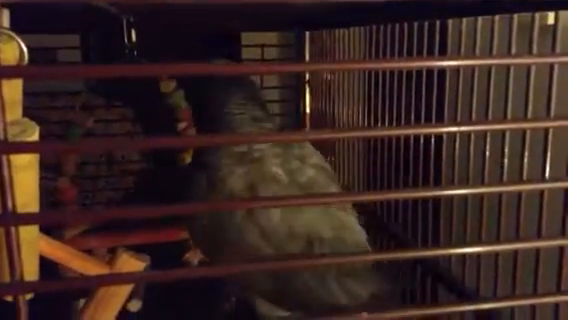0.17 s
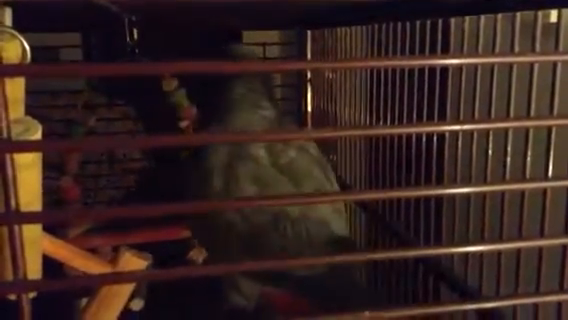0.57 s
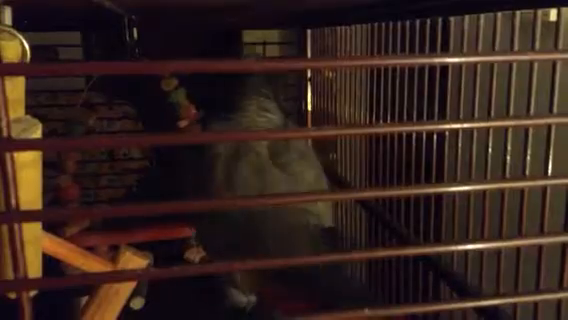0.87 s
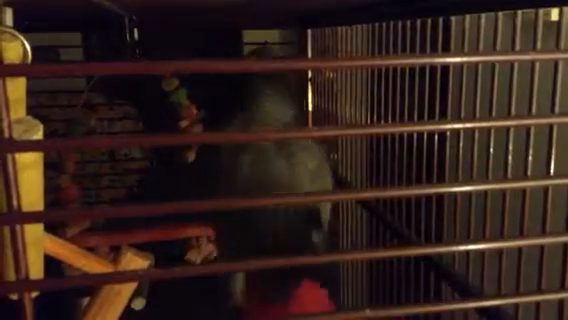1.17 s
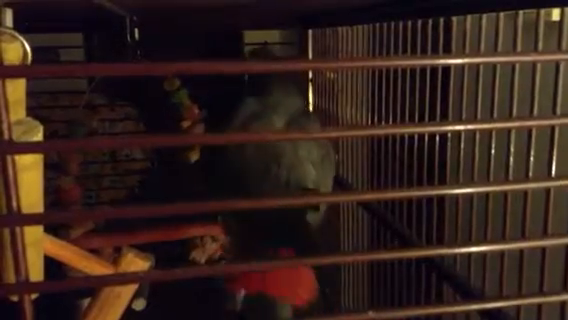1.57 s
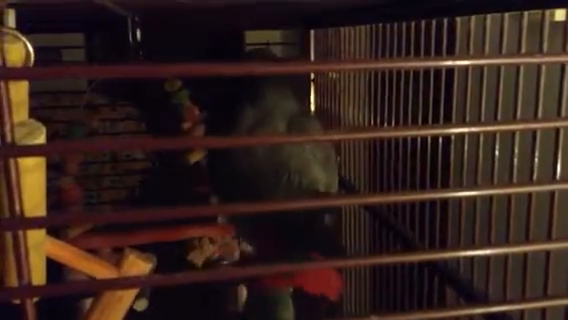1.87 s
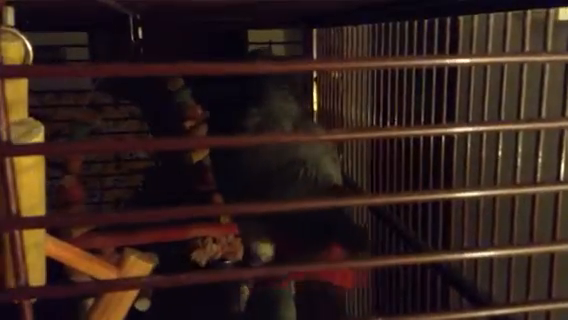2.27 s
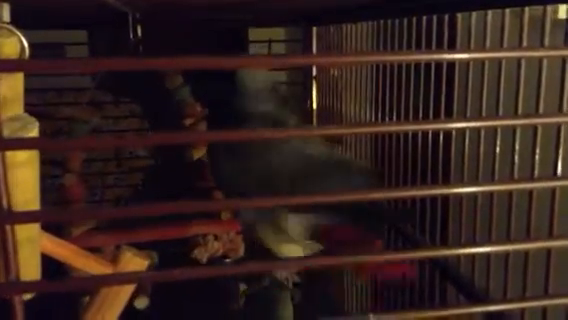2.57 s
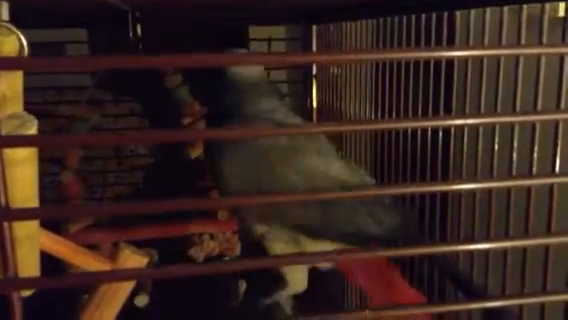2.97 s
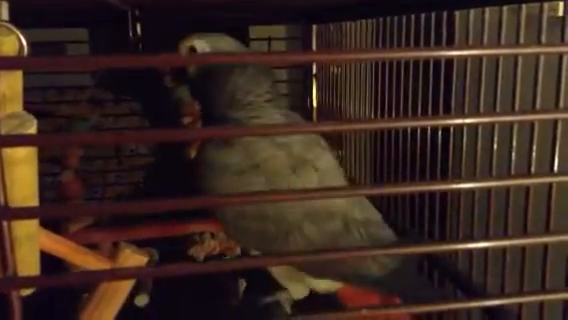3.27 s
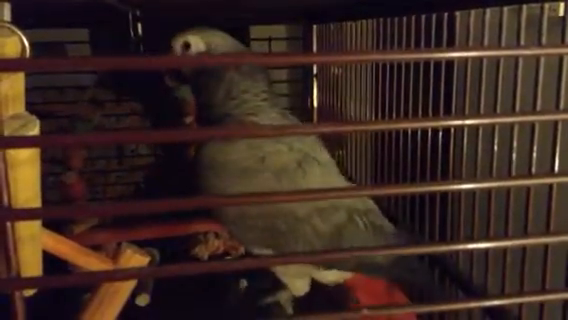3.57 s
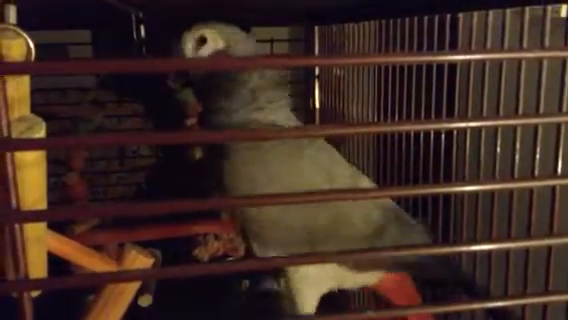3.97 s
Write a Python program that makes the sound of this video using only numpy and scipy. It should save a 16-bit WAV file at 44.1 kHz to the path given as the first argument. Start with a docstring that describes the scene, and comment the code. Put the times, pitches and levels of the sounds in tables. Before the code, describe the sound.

Close in a quiet room with faint low ventilation hum, a grey parrot nibbles a wooden toy. Scattered beak clicks and a crisp crunch lead to a hollow peck at one second, then a tiny squeak. Sparse clicks follow, then creaky claw jerks and a dense clicking burst, a heavier knock that rattles perch and cage, a faint feather rustle, and the sharpest cracks near the end. A small microphone catches short room reflections.

```python
"""A quiet room with a low ventilation hum, where a parrot nibbles a wooden toy inside its wire cage.
The beak clicks on the wood, fibres tear in short crunches, and feathers and claws brush and scrape.
A firm peck rings the toy, two rubs squeak, and one heavier knock shakes the perch and cage.
Beak, claws, feathers and knock also come back off the nearby surfaces and the room.
Clicks and tears are shaped noise, rings are decaying sines; a small microphone takes it all in."""
import sys
import numpy as np
from scipy import signal
from scipy.fft import rfft, irfft
from scipy.io import wavfile
from scipy.ndimage import map_coordinates

SR = 44100
rng = np.random.default_rng(int(sys.argv[2]) if len(sys.argv) > 2 else 0)


def persist_wave(psi):
    """Save psi, clipped to +-1, as 16-bit WAV."""
    counts = np.round(np.clip(psi, -1, 1) * 32767).astype(np.int16)
    wavfile.write(sys.argv[1], SR, np.atleast_2d(counts).T)


N = 182177

# room air, spectrum of the ventilation rush: (frequency [Hz], level per hertz [dB])
AIR_SPECTRUM = [(25, -16.5), (55, -16.5), (95, -34), (125, -23.5), (165, -6.5), (230, -6.5), (310, -10.5),
                (420, -20), (700, -17), (1100, -20), (1700, -31.5), (3500, -37), (8000, -36.5),
                (15500, -37.5)]
AIR_DB = -63.0  # rms before the flutter
# steady hum lines: (frequency [Hz], level [dB rms], largest waver [dB])
HUM_LINES = [(120.7, -82, 1.5), (209.1, -70, 3.5), (237, -66.5, 0), (303, -76.5, 6.5), (363.2, -79, 4.5)]
# a strong low hum line that swells now and then: (time [s], level [dB rms])
LOW_HUM_LEVEL = [(0, -76), (.25, -75), (.35, -61), (.58, -64), (.7, -67), (1.05, -73), (1.7, -70.5),
                 (1.9, -60), (2.02, -77), (2.75, -69.5), (2.87, -63), (3.15, -67), (3.85, -72), (3.97, -76),
                 (4.13, -67)]
LOW_HUM_HZ = 170.3
# soft low bumps: (time [s], relative level [dB], frequency [Hz])
SOFT_BUMPS = [(.002, -31.5, 369), (.004, -30, 166), (1.403, -29.5, 250)]
# feathers brush as the bird shifts:
# (time of the height [s], level [dB], half length [s], treble [dB], singing resonance [dB])
FEATHER_RUBS = [(.01, -64.5, 0.014, -8.5, -3), (0.064, -69, 0.04, -6.5, -5),
                (3.369, -69.5, 0.022, -1.5, 14), (3.406, -67.5, 0.019, -3, 6)]
# spectrum of the feathers: (frequency [Hz], level per hertz [dB])
FEATHER_SPECTRUM = [(80, -26), (300, -2), (900, -15), (1700, -4.5), (2500, -5.5), (3300, -8.5),
                    (5000, -11.5), (9000, -9.5), (15000, -12)]
RUB_HZ, RUB_WIDTH_HZ = 2570, 230  # the resonance in which feathers sing
# beak and claw clicks: (time [s], relative level [dB], relative treble [dB], relative body [dB],
# wood resonance [Hz], its strength [dB], second resonance [Hz], level sent to the room [dB])
WOOD_CLICKS = [(0.136, -42.5, -29, 0, 2300, 5, 4930, 0), (0.152, -38.5, -8, -5, 3420, 7, 8700, -9),
               (0.1653, -35.5, -24, 3.5, 2170, 6, 5200, 2), (0.2875, -36.5, -32, -14, 3030, 6, 4220, -2.5),
               (.405, -40, -6.5, -11, 3970, 17.5, 7500, 1.5), (0.5334, -44, -10, -24, 2980, 28, 7850, 5.5),
               (0.6062, -37.5, -23, -10, 3700, 6, 8000, 2), (0.6202, -37, -6, -15, 4200, 11, 10000, -3),
               (0.629, -31, 4, -18, 3000, 11, 13000, -4), (0.6367, -26.5, 0, -11, 4170, 3, 10200, 0),
               (0.917, -34.5, -4.5, -9, 2800, 6, 4050, 2.5), (0.944, -33, 1, -1, 3050, 11, 8650, 2.5),
               (0.955, -28, 3, -6, 2970, 13, 8500, -3), (0.9925, -23.5, -8, -3, 5200, 16.5, 6950, -2.5),
               (1.19, -48.5, -29, -6, 2660, 31, 4400, 2), (1.2175, -35.5, 3.5, -8, 4320, 26.5, 5630, -6),
               (1.2471, -45, -28, -18, 2440, 12, 4200, -4), (1.9539, -41, -8, -12, 2810, 19, 8000, 1.5),
               (2.1129, -22, -5.5, -5.5, 2200, 11, 3530, -3.5), (2.1195, -34, -15, 1, 2310, 15, 3500, -1),
               (2.1815, -39, -4, -10, 2380, 15, 7900, 5.5), (2.2056, -36.5, -6, -8, 2100, 18, 3030, -1),
               (2.2335, -53, -5, -12, 4300, 13, 9000, -11), (2.2645, -46, -4, -22, 3420, 14, 8100, -7),
               (2.5579, -28, 4, -6.5, 2180, 11.5, 2850, 1), (2.5674, -32.5, 4, -13, 2850, 22, 10900, -9),
               (2.5688, -28.5, -1, -8, 4400, 7, 9400, -1), (2.5862, -31.5, -8, -8, 5230, 11, 2700, -4),
               (2.6119, -26, 2.5, -20, 2260, 14, 5230, -3.5), (2.636, -45, -7, -8, 2200, 13, 7500, 1),
               (2.678, -44, -11, 1, 2540, 10, 7800, 5.5), (2.7012, -36, 0, -22, 4160, 12, 8800, 3),
               (2.7195, -31, 14, -24, 4160, 10, 8340, -3), (2.724, -33.5, 12, -17, 4200, 8, 8400, -7),
               (2.749, -39, 8, -24, 4300, 5, 11000, -4), (2.754, -34, 11, -24, 4300, 0, 8460, -1),
               (2.7727, -30, 6, -14, 4400, -6, 9700, -7), (2.7792, -29.5, 12, 0, 4350, 6, 9650, 1.5),
               (3.033, -39.5, -20, -18, 3720, 7, 4800, -0.5), (3.06, -45, -37, -11, 3440, 18, 4560, -0.5),
               (3.6943, -21.5, -0.5, -17, 4200, 7.5, 5350, 0), (3.7204, -28, 0.5, -8.5, 4830, 12, 7400, 1),
               (3.7472, -34.5, -1, -4, 2430, 14, 10500, 0.5), (3.7717, -45, -6, -4, 3700, 10, 5000, -5),
               (3.7958, -30, -2, -13, 4380, 8, 2430, -0.5), (3.7976, -27, -7, -11, 4400, 14, 2420, -5),
               (3.838, -23, 1, -24, 3500, 14, 9500, -6), (3.8503, -18.5, 7, -4, 6900, 26, 9300, -2),
               (3.8535, -18, 0.5, -15, 5500, 13, 9300, 2), (3.8769, -23, 6.5, 3.5, 3470, 16, 9100, -2),
               (3.9697, -33, -6, -20, 3870, 10, 14000, -13), (3.989, -47, -2, -19, 3720, 14, 12100, -8)]
# spectrum of the toy's wood: (frequency [Hz], level per hertz [dB])
WOOD_SPECTRUM = [(60, -35), (150, -16), (500, -21.5), (1000, -11), (1600, -3.5), (2200, 0), (2700, 2),
                 (3600, 3.5), (4500, 2.5), (7000, 1.5), (10000, 2.5), (15500, -2.5)]
# crunches and scrapes: (time of the height [s], level [dB], rise [s], fall [s], treble [dB],
# wood resonance [Hz], its strength [dB], level sent to the room [dB])
FIBRE_TEARS = [(0.188, -62, 0.056, 0.034, -8, 2180, 10, 2), (0.626, -49, 0.019, 0.014, -2, 3900, 10, -8),
               (.638, -36, 0.0059, 0.008, 3.5, 3970, 10.5, -1.5),
               (1.022, -63, 0.016, 0.028, -6, 5000, 32, -12),
               (1.226, -68.5, 0.055, 0.071, -35, 4100, 6, 1.5),
               (2.15, -69.5, 0.043, 0.081, -14, 7160, 3, 6),
               (2.222, -49, .005, 0.013, -3.5, 9000, 19, -4.5),
               (2.601, -64.5, 0.04, 0.066, -9, 5270, 14, -3), (2.753, -55, 0.035, 0.015, -2, 4050, 15, 1),
               (2.778, -41.5, 0.007, 0.01, -1, 4370, 12.5, -4), (3.78, -55, 0.0073, 0.016, -8, 3600, 0, 1),
               (3.8406, -32, 0.0028, 0.007, 8, 3560, 6, 3),
               (3.85, -28.5, 0.0052, 0.0057, 5, 9000, 11.5, -0.5),
               (3.965, -55.5, .0058, 0.017, 1, 3850, 8, 9.5)]
SLIPS_PER_STROKE = 24  # mean slips in one rise plus fall: a quick bite slips faster than a slow scrape
# what the wooden block rings with: (frequency [Hz], level [dB], time to fall 60 dB [s])
BLOCK_MODES = [(880, 2, 0.09), (1039, -5.5, 0.22), (1455, 1, 0.054), (1480, -5, 0.15), (2040, 2.5, 0.031)]
TOY_S, TOY_DB = 1, -24.5  # one firm peck rings the whole block
# squeaky rubs of the beak: (time of the height [s], level [dB], half length [s])
BEAK_RUBS = [(1.377, -58.5, 0.014), (1.3965, -47.5, 0.0079)]
# the resonances that a squeak sings in: (frequency [Hz], width [Hz], level [dB])
SQUEAK_RESONANCES = [(2400, 390, -6), (3100, 220, -5), (4000, 350, -3), (4850, 400, -1), (5520, 260, 9.5),
                     (7900, 700, 0), (8850, 450, 3), (13200, 3600, -13)]
SQUEAK_RISE_PER_S = 2.0  # share per second by which the pitch climbs during a rub
# a claw catches and jerks along the perch: (time [s], relative level [dB])
CLAW_JERKS = [(2.449, -51), (2.4586, -47.5), (2.4846, -42.5), (2.504, -43), (2.5154, -43.5), (2.5233, -43),
              (2.536, -44), (2.543, -43), (2.551, -43), (2.723, -39), (2.737, -46), (2.744, -44),
              (2.762, -41)]
# the resonances that each jerk creaks in: (frequency [Hz], width [Hz], level [dB])
CREAK_RESONANCES = [(2110, 130, 0), (2900, 220, -2), (3870, 160, 4), (4630, 180, 2), (5330, 97, 0),
                    (7300, 700, -6), (8500, 520, -8.5), (9600, 680, -9), (12600, 2700, -27)]
KNOCK_S, KNOCK_DB = 2.9177, -37  # the blow that shakes the perch; the level scales all its parts
REBOUND_S, REBOUND_DB = 0.0032, 2.5  # time and change of level from one perch contact to the next
# what the perch and cage ring with: (frequency [Hz], level [dB], time to fall 60 dB [s])
PERCH_MODES = [(161, 0, 0.063), (211, 0, 0.18), (245, -7, 0.21), (275, 4, 0.25), (341, -14, 0.63),
               (415, -2, 0.11), (520, 8, 0.23), (563.3, 15, 0.22), (653, 2, 0.16), (730, 4, 0.13),
               (772, 2, 0.23), (980, -6, 0.12), (1126, -16, 0.11), (1390, -13, 0.14), (1827, 17, 0.041),
               (2100, -9, 0.16), (2666, 12.5, 0.05)]
# spectrum of each perch contact: (frequency [Hz], level per hertz [dB])
KNOCK_SPECTRUM = [(50, -13), (105, -42), (180, 1), (270, -14), (420, -9.5), (550, 2.5), (800, -4.5),
                  (1030, 3.5), (1500, -15.5), (1850, -8.5), (4500, -11.5), (10000, -25.5), (15000, -32)]
# spectrum of the cage rattle and of the thud in the room: (frequency [Hz], level per hertz [dB])
RATTLE_SPECTRUM = [(50, -12), (105, -17), (180, 4.5), (270, 10), (420, -1), (560, 6), (750, -3.5),
                   (1050, -0.5), (1500, -5.5), (2100, -5.5), (4500, -8), (10000, -24), (15000, -51)]
# how long the room holds each pitch: (frequency [Hz], time to fall 60 dB [s])
ROOM_DECAY = [(200, 0.75), (950, 0.61), (4000, 0.31), (9000, 0.2), (15000, 0.14)]
TOP_HZ = 15650  # upper limit of the recorder


def undb(db):
    """Decibels to gain."""
    return 10 ** (np.asarray(db) / 20)


def unit(x):
    """Scale to an energy of one."""
    return x / np.sqrt(np.sum(x ** 2) + 1e-20)


def on_log(hz, points):
    """Read (Hz, value) points on a log-frequency axis."""
    f, value = np.transpose(points)
    return np.interp(np.log(np.maximum(hz, 1)), np.log(f), value)


def colour(x, points, extra_db=0, size=4096):
    """Causal minimum-phase filter with the given spectrum plus extra decibels per bin."""
    db = on_log(np.arange(size // 2 + 1) * SR / size, points) + extra_db
    # folding the cepstrum forward puts the energy as early as it can be
    cepstrum = irfft(np.log(undb(db)))
    cepstrum[1:size // 2] *= 2
    cepstrum[size // 2 + 1:] = 0
    response = irfft(np.exp(rfft(cepstrum)))
    return signal.fftconvolve(x, response)[:len(x)]


def add(out, s, x):
    """Mix x into out from time s on."""
    i = max(int(s * SR), 0)
    out[i:i + len(x)] += x[:len(out) - i]


def walk(rate):
    """Random drift in straight lines between normal draws, rate draws per second."""
    knots = rng.standard_normal(256)
    return np.interp(np.arange(N) / SR * rate, np.arange(len(knots)), knots)


def even(x):
    """Level the spectrum of x and keep its phases, so its timing stays."""
    spectrum = rfft(x)
    return irfft(spectrum / (np.abs(spectrum) + 1e-12))


def burst(decay_s, size=4096):
    """A dying spray of tiny impulses with a nearly even spectrum."""
    fade = np.exp(-np.arange(size) / SR / max(decay_s, 1e-4))
    spray = even(rng.standard_normal(size) * fade)
    return unit(spray * np.sqrt(fade))


def resonate(x, modes):
    """Pass x through (Hz, width Hz, dB) resonances side by side."""
    return sum(undb(g) * signal.lfilter(*signal.iirpeak(hz, hz / width, fs=SR), x)
               for hz, width, g in modes)


def ring_down(t, modes, cycles):
    """Sum of decaying sines from (Hz, dB, t60 s) modes, each starting at its share of a cycle."""
    return sum(undb(g - 60 * t / t60) * np.sin(2 * np.pi * (hz * t + cycle))
               for (hz, g, t60), cycle in zip(modes, cycles))


def since_last_slip(t, mean_gap_s):
    """Seconds since the last slip, with slips at uneven gaps."""
    slips = t[0] + np.cumsum(rng.uniform(.5, 1.5, 1024)) * mean_gap_s
    return np.abs(t - slips[np.searchsorted(slips, t) - 1])


def ventilation(waver_db=2.0):
    """A low rush of filtered noise whose rumble flutters, with wavering sine hum lines."""
    t = np.arange(N) / SR
    air = unit(colour(rng.standard_normal(N), AIR_SPECTRUM)) * np.sqrt(N) * undb(AIR_DB)
    for lo, hi in [(150, 260), (260, 450), (450, 800), (800, 1500)]:  # Hz
        band_pass = signal.butter(3, [lo, hi], "band", fs=SR, output="sos")
        band = signal.sosfiltfilt(band_pass, air)
        air = air + band * (undb(2 * np.tanh(walk(10))) - 1)
    low_level = np.interp(t, *np.transpose(LOW_HUM_LEVEL))
    hum = np.zeros(N)
    for hz, db, waver in list(HUM_LINES) + [(LOW_HUM_HZ, low_level, waver_db)]:
        level = undb(db + waver * np.tanh(walk(8)))
        hum += level * np.sin(2 * np.pi * hz * t + 0.63 * walk(22))  # the phase wanders too
    return air + np.sqrt(2) * hum  # rms to peak


def bumps(gain_db=3.0, decay_s=0.0039, size=4096):
    """Dull bumps: low sines that swell and die within a few cycles."""
    out, t = np.zeros(N), np.arange(size) / SR
    for s, db, hz in SOFT_BUMPS:
        bump = t * np.exp(-t / decay_s) * np.sin(2 * np.pi * hz * t)
        add(out, s, undb(db + gain_db) * unit(bump))
    return out


def rustles(flicker_db=5.0):
    """Soft, uneven swishes of feathers, noise under a bell-shaped swell; some rubs sing faintly."""
    out, t = np.zeros(N), np.arange(N) / SR
    for s, db, length, bright_db, sing_db in FEATHER_RUBS:
        spectrum = [(hz, g + bright_db * (hz > 4500)) for hz, g in FEATHER_SPECTRUM]
        swish = colour(rng.standard_normal(N), spectrum)
        swish = swish + (undb(sing_db) - 1) * resonate(swish, [(RUB_HZ, RUB_WIDTH_HZ, 0)])
        out += undb(db) * swish / np.std(swish) * np.exp(-((t - s) / length) ** 2)
    return out * undb(flicker_db * walk(60))


def wood(x, treble_db, body_db, ring_hz, ring_db, ring_width, ripple_db, mode_spacing_hz=210, size=4096):
    """The toy's voice: each spot has one main resonance and its own mix of smaller ones."""
    hz = np.arange(size // 2 + 1) * SR / size + 1
    shelves = treble_db / (1 + (7000 / hz) ** 5) + body_db / (1 + (hz / 2100) ** 6)
    ring = ring_db / (1 + (np.log(hz / ring_hz) / ring_width) ** 2)
    modes = np.clip(rng.standard_normal(256), -1.5, 1.5)
    ripple = ripple_db * np.interp(hz / mode_spacing_hz, np.arange(len(modes)), modes)
    return unit(colour(x, WOOD_SPECTRUM, shelves + ring + ripple))


def clicks(gain_db=9.5, treble_db=5, body_db=12, bite_s=0.000903, touch_db=-16,
           upper_db=6, upper_width=0.073):
    """The beak touches wood, then snaps in; the resonances face the microphone, the room gets it blunter."""
    out, sent = np.zeros(N), np.zeros(N)
    snap_decay_s, room_share = .00055, .4  # share of the resonances that reaches the room
    for s, db, bright_db, low_db, hz, ring_db, upper_hz, room_db in WOOD_CLICKS:
        contact = undb(touch_db) * burst(0.00012)
        add(contact, bite_s, burst(snap_decay_s))
        click, blunt = (
            wood(contact, treble_db + bright_db, body_db + low_db, hz, share * ring_db,
                 ring_width=0.15, ripple_db=share * 5.6)
            for share in (1, room_share))
        second = signal.lfilter(*signal.iirpeak(upper_hz, 1 / upper_width, fs=SR), click)
        add(out, s, undb(db + gain_db) * unit(click + (undb(upper_db) - 1) * second))
        add(sent, s, undb(db + gain_db + room_db) * blunt)
    return out, sent


def crunches(grain_rate=2600, scatter_db=5, slip_s=0.0017, drag=0.44,
             body_db=2, body_per_db=-0.33, size=16384):
    """The beak sticks and slips, tearing fibres in sprays of micro-cracks; hard bites sound thinner."""
    out, sent = np.zeros(N), np.zeros(N)
    t = (np.arange(size) - size // 2) / SR
    room_share = .4  # the room gets a blunter sound
    for s, db, rise, fall, bright_db, hz, ring_db, room_db in FIBRE_TEARS:
        since_slip = since_last_slip(t, (rise + fall) / SLIPS_PER_STROKE)
        cracks = (rng.random(size) < grain_rate / SR) * rng.choice([-1, 1], size)
        # most cracks are tiny, a few are large
        cracks = cracks * undb(scatter_db * np.minimum(rng.exponential(size=size), 3))
        swell = np.exp(-np.abs(t / np.where(t < 0, rise, fall)) ** 2)
        low_db = body_db + body_per_db * (db + 46)
        force = cracks * swell * (drag + np.exp(-since_slip / slip_s))
        # the moving beak meets many spots, so the smaller resonances blur
        tear, blunt = (
            wood(force, bright_db, low_db, hz, share * ring_db,
                 ring_width=0.13, ripple_db=share * 2.0)
            for share in (1, room_share))
        gain = undb(db) * np.sqrt(np.sum(swell ** 2))
        add(out, s + t[0], gain * tear)
        add(sent, s + t[0], gain * undb(room_db) * blunt)
    return out, sent


def toy(size=11025):
    """The short, hollow ring of the wooden block, a sum of decaying sines."""
    out, t = np.zeros(N), np.arange(size) / SR
    ring = ring_down(t, BLOCK_MODES, np.zeros(len(BLOCK_MODES)))
    add(out, TOY_S, undb(TOY_DB) * unit(ring))
    return out


def squeaks(slip_count=7, slip_s=0.0018, drag=0.12, size=16384):
    """The beak skids over a smooth spot; its slips sing in resonances that climb as it presses."""
    out, t = np.zeros(N), (np.arange(size) - size // 2) / SR
    for s, db, length in BEAK_RUBS:
        since_slip = since_last_slip(t, 2 * length / slip_count)  # a short rub slips faster
        swell = np.exp(-(t / length) ** 2)
        rub = rng.standard_normal(size) * swell * (drag + np.exp(-since_slip / slip_s))
        # reading ever faster through the sound makes its pitch climb
        read_at = (t + SQUEAK_RISE_PER_S * t ** 2 / 2 - t[0]) * SR
        song = map_coordinates(resonate(rub, SQUEAK_RESONANCES), [read_at])
        add(out, s + t[0], undb(db) * unit(song) * np.sqrt(np.sum(swell ** 2)))
    return out


def creaks(gain_db=11.0, grit_s=0.004):
    """Each jerk of the claw is a gritty tick ringing short resonances, a little new at each grip."""
    out = np.zeros(N)
    detune, vary_db = .013, 2.5  # spread of pitch (share) and of level
    for s, db in CLAW_JERKS:
        chance = rng.standard_normal((len(CREAK_RESONANCES), 2))
        modes = [(hz * (1 + detune * a), width, g + vary_db * b)
                 for (hz, width, g), (a, b) in zip(CREAK_RESONANCES, chance)]
        add(out, s, undb(db + gain_db) * unit(resonate(burst(grit_s), modes)))
    return out


def knock(ring_db=29, crack_db=22.5, rattle_db=29.0, rattle_s=0.04, give_s=0.00089,
          spill_db=29, count=3, size=22050):
    """A blow rings the perch, which chatters on its bracket; the cage rattles and thuds into the room."""
    out, sent, t = np.zeros(N), np.zeros(N), np.arange(size) / SR
    ring = ring_down(t, PERCH_MODES, rng.random(len(PERCH_MODES)))
    ring = ring * (1 - np.exp(-t / give_s))  # the wood takes a moment to give
    rattle = colour(burst(2 * rattle_s, size=size) * np.exp(-t / rattle_s / 2), RATTLE_SPECTRUM)
    add(out, KNOCK_S, undb(ring_db) * unit(ring) + undb(rattle_db) * unit(rattle))
    for k in range(count):
        crack = unit(colour(burst(0.00075), KNOCK_SPECTRUM))
        add(out, KNOCK_S + k * REBOUND_S, undb(crack_db + k * REBOUND_DB) * crack)
    thud = unit(colour(burst(0.0051), RATTLE_SPECTRUM))
    add(sent, KNOCK_S, undb(spill_db) * thud)
    return undb(KNOCK_DB) * out, undb(KNOCK_DB) * sent


def room(x, near_db=-5, near_s=0.018, near_lag_s=0.0015, tail_db=-9, size=26460):
    """Quick scatter from the cage tray and walls, then a short tail that loses its treble first."""
    t, hz = np.arange(size) / SR, np.arange(size // 2 + 1) * SR / size
    near = np.zeros(size)
    add(near, near_lag_s, burst(near_s))
    noise = rfft(even(rng.standard_normal(size)))
    edges = [0, 400, 1500, 3000, 5000, 8000, 12000, 22051]  # Hz
    tail = np.zeros(size)
    for lo, hi in zip(edges, edges[1:]):
        band = irfft(noise * (hz >= lo) * (hz < hi))
        tail += band * undb(-60 * t / on_log((lo + hi) / 2, ROOM_DECAY))
    tail = tail * (1 - np.exp(-t / 0.0085))  # the tail builds gradually
    return signal.fftconvolve(x, undb(near_db) * near + undb(tail_db) * unit(tail))[:N]


def scene(squeak_room_db=-7, creak_room_db=-3):
    """The bird in its cage over the hum; the knock scatters less off the cage than small sounds."""
    taps, taps_sent = clicks()
    tears, tears_sent = crunches()
    blow, blow_sent = knock()
    skids, claws, feathers = squeaks(), creaks(), rustles()
    small_sent = taps_sent + tears_sent + feathers
    small_sent = small_sent + undb(squeak_room_db) * skids + undb(creak_room_db) * claws
    echoes = room(small_sent) + room(blow_sent, near_db=-12.5, tail_db=-6.5)
    direct = bumps() + feathers + taps + tears + toy() + skids + claws + blow
    return (direct + echoes + ventilation())[None]


def record(dry, low_hz=110):
    """The small microphone thins the bass and the recorder cuts the top."""
    thin = signal.sosfilt(signal.butter(2, low_hz, "high", fs=SR, output="sos"), dry)
    return signal.sosfilt(signal.ellip(10, .2, 75, TOP_HZ, fs=SR, output="sos"), thin)


dry = scene()
out = record(dry)
persist_wave(out)
```